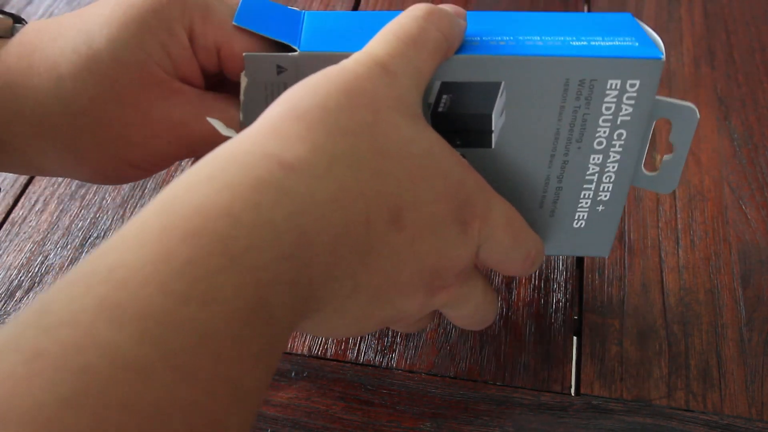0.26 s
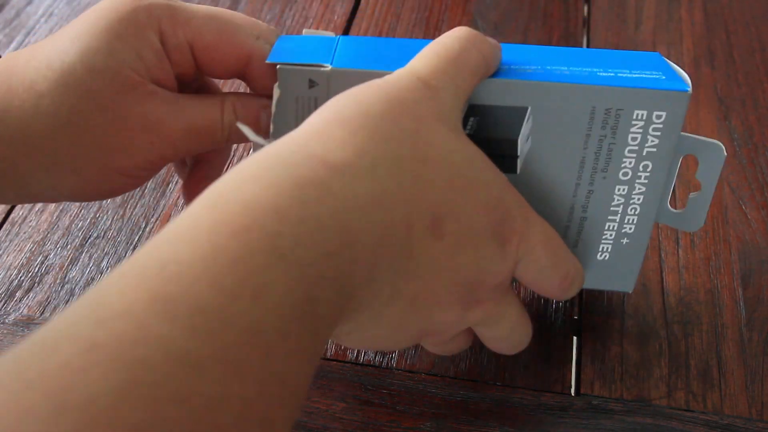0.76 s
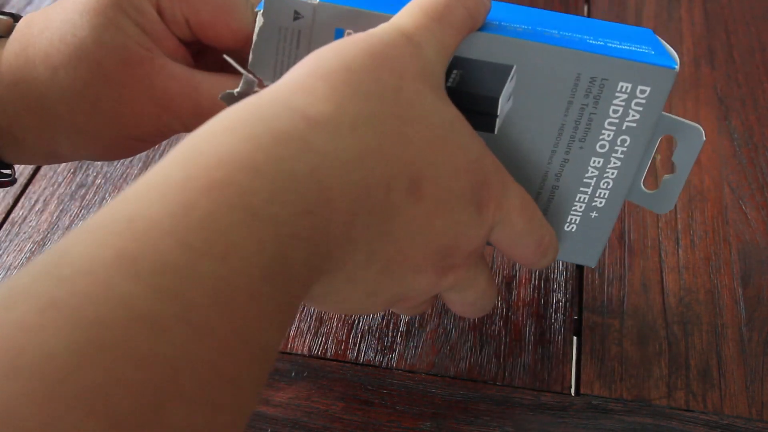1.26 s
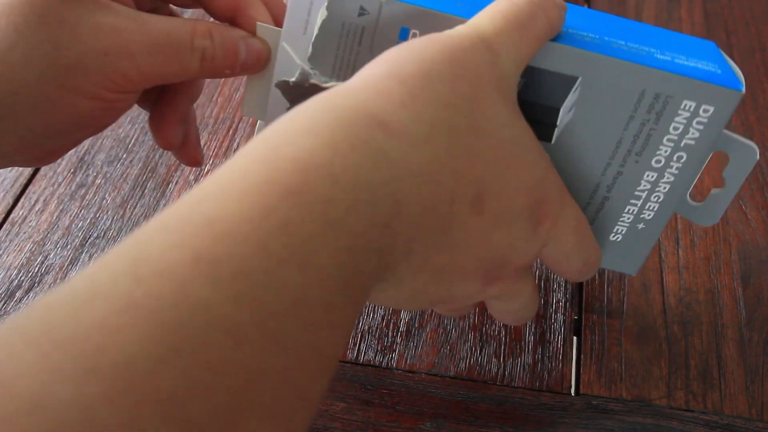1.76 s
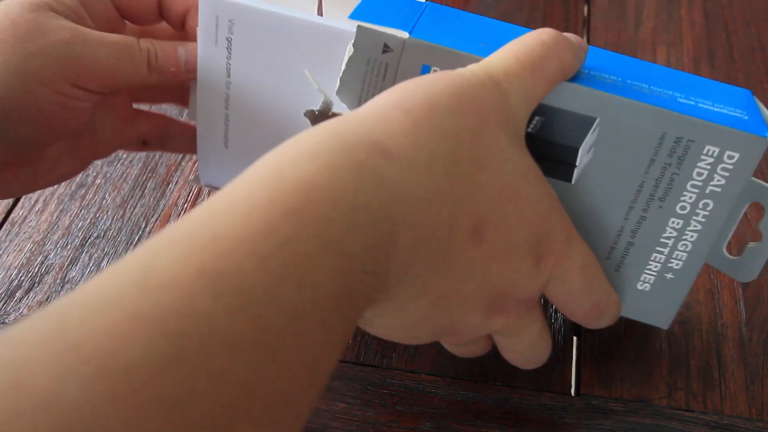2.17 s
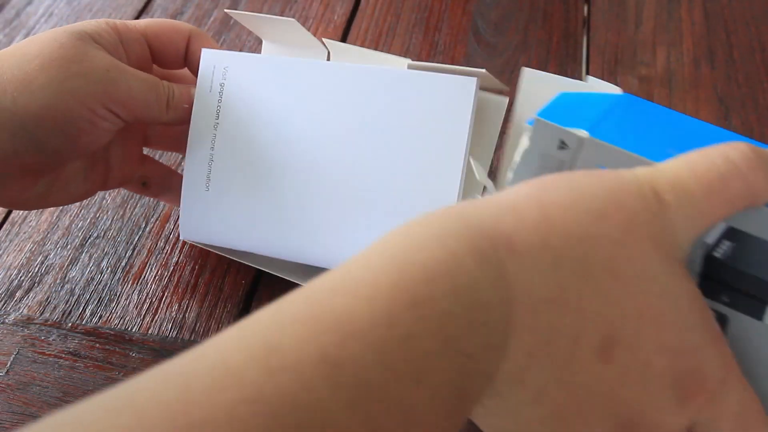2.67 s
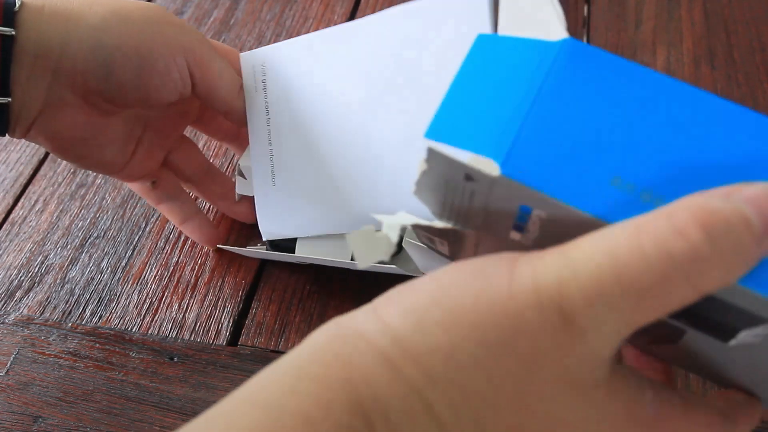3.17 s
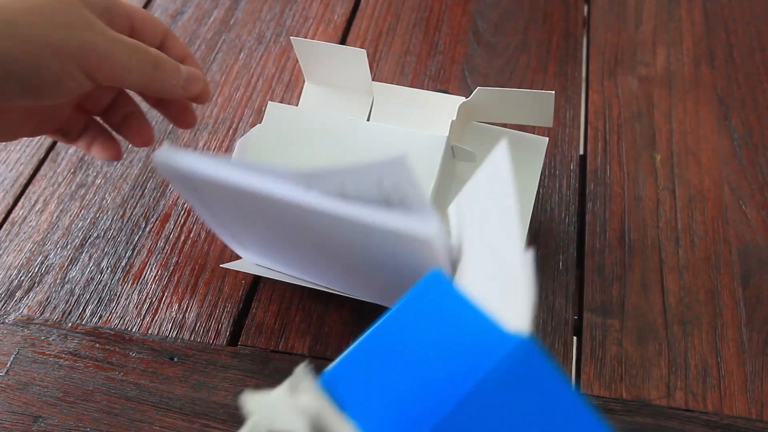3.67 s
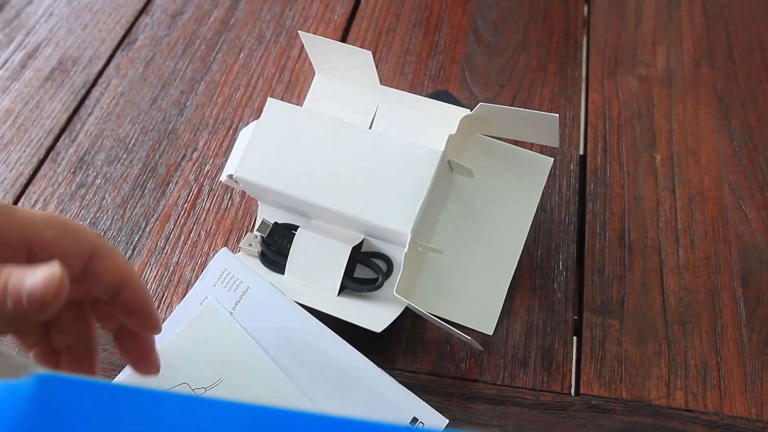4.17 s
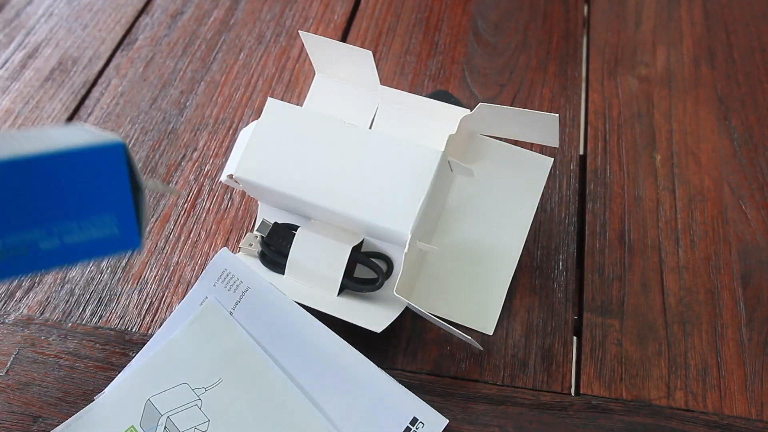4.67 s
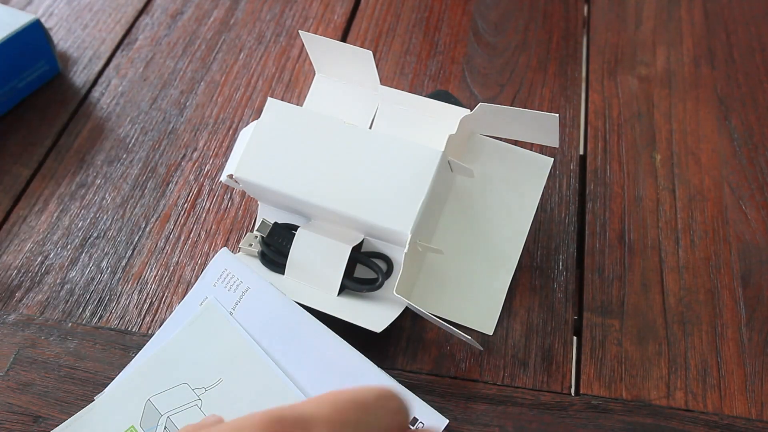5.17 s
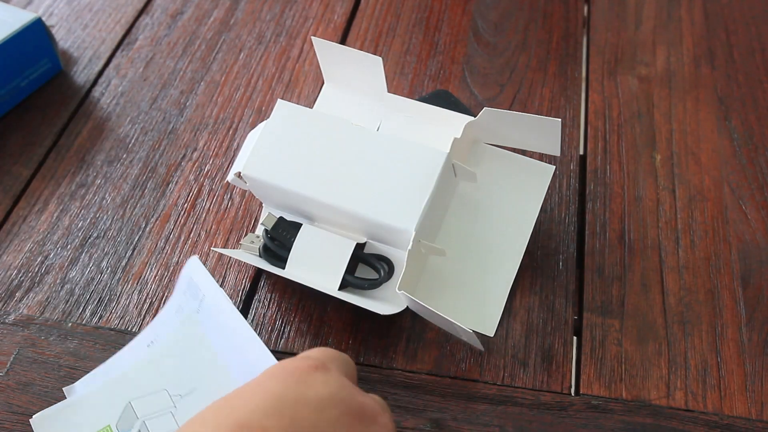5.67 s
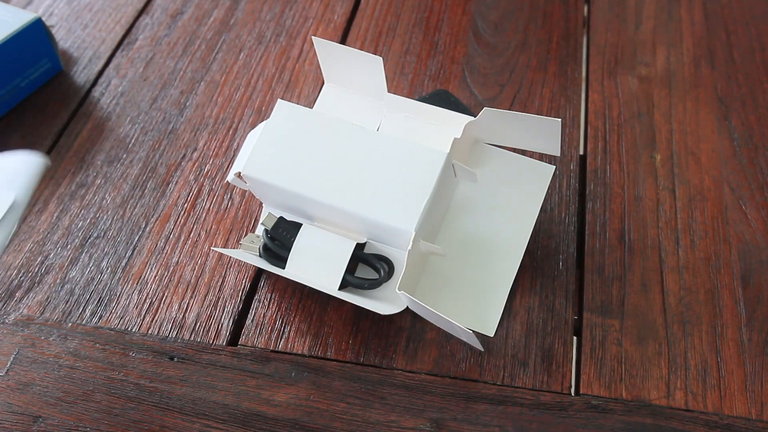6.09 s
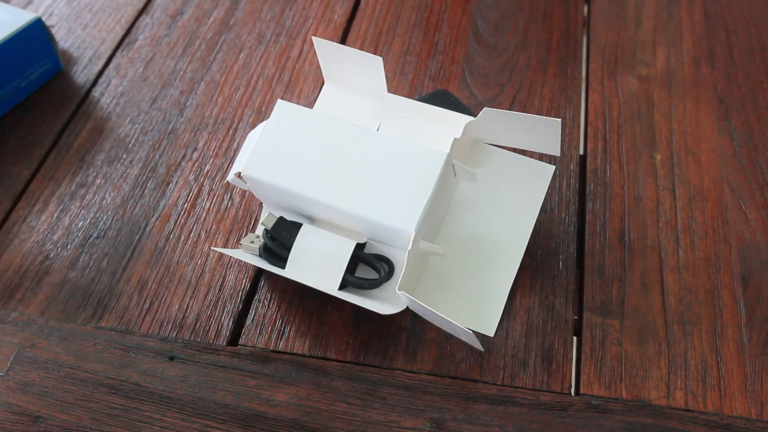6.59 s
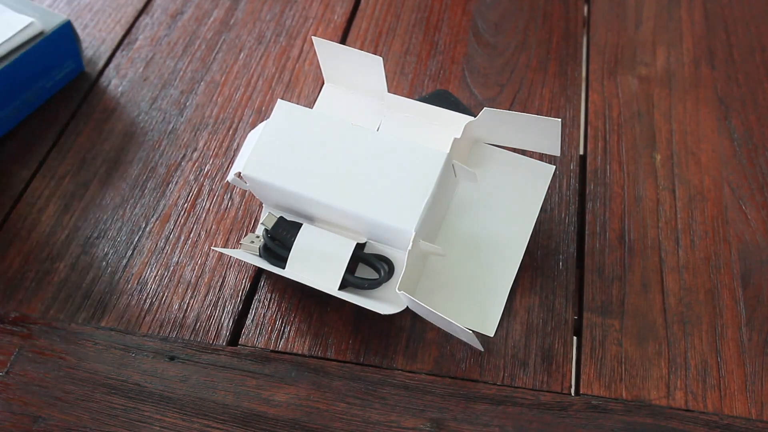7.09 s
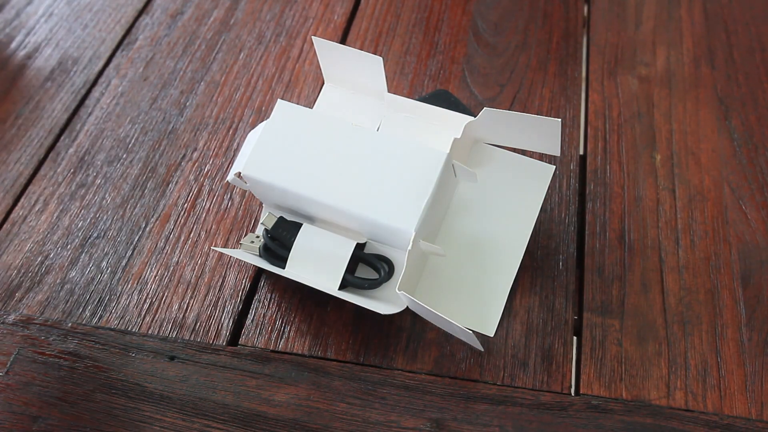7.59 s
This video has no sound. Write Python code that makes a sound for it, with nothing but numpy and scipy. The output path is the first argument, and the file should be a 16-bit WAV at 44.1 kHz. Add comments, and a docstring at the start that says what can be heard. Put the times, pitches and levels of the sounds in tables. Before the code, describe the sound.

Thin cardboard rubs and ticks as a tray is dragged from its sleeve, bumps onto wood, then paper slaps down and packaging knocks the table.

```python
"""Card rubs and ticks close by as a tray is worked out of its sleeve, then bumps, drops and skids on a wooden table.
A paper leaflet slaps down; sleeve and leaflet stroke the boards, and packaging knocks on them.
Impacts are noisy contacts that excite decaying modes, shaped band by band; rubbing is stick-slip friction
through panel resonances; low modes boom under the heavier pushes. A diffuse echo and quiet air surround all.
"""
import sys
import numpy as np
from scipy import signal
from scipy.fft import rfft, irfft, next_fast_len
from scipy.io import wavfile

SR = 44100
rng = np.random.default_rng(int(sys.argv[2]) if len(sys.argv) > 2 else 0)


def file_out(sig):
    """Save sig as 16-bit WAV at sys.argv[1]."""
    # one column per channel
    cols = np.atleast_2d(sig).T
    # limit, then scale
    lim = np.clip(cols, -1, 1)
    pcm = np.round(lim * 32767).astype(np.int16)
    wavfile.write(sys.argv[1], SR, pcm)


N = 345744
TIME = np.arange(N) / SR  # s
BLOW_SIZE = 8192  # samples in one impact
CUTOFF_HZ = 15950  # upper limit of the sound

# edges of the rubbing bands body, rasp and hiss: frequency [Hz]
RUB_EDGES_HZ = [150, 900, 3500, 18000]
# spectrum of card sliding: (frequency [Hz], filter gain [dB])
CARD_SPECTRUM = [(59, -35), (100, -32), (135, -15.5), (229, -10), (389, -4.5), (442, -4.5), (558, -1.5),
                 (891, -4.5), (1310, -3.5), (1680, -6.5), (4980, -13), (13800, -13.5), (16000, -20)]
# the tray creeps, then slides out of the sleeve; levels before the offsets in pulling():
# (time [s], rasp level [dB], hiss level [dB])
PULL_COURSE = [(0.0, -53, -54), (0.4, -51, -60.5), (0.58, -50, -54), (0.69, -51.5, -60), (0.97, -54, -59),
               (1.42, -46.5, -52), (1.59, -38.5, -51), (1.73, -42.5, -37), (1.84, -37.5, -45),
               (2.0, -57, -68), (2.26, -42, -54), (2.42, -47, -48), (2.66, -41.5, -45.5),
               (2.78, -56, -35.5)]


def from_db(db):
    """Convert a level in decibels to an amplitude ratio."""
    return 10 ** (np.asarray(db) / 20)


def rms(x):
    """Root mean square, the effective amplitude."""
    return np.sqrt(np.mean(x ** 2) + 1e-20)


def unit(x):
    """Normalise a signal to energy 1."""
    return x / np.sqrt(np.sum(x ** 2) + 1e-20)


def at_hz(points, hz, axis=1):
    """Interpolate a table column linearly in log frequency."""
    points = np.array(points)
    return np.interp(np.log(np.maximum(hz, 1)), np.log(points[:, 0]), points[:, axis])


def band(x, low, high):
    """Causal Butterworth band-pass: the output never precedes the input."""
    sections = signal.butter(3, [low, high], "band", fs=SR, output="sos")
    return signal.sosfilt(sections, x)


def colour(x, points):
    """Minimum-phase filter, built by folding the cepstrum of a (Hz, dB) curve: nothing sounds early."""
    size = 2 * next_fast_len(len(x) // 2 + BLOW_SIZE)
    gain = from_db(at_hz(points, np.fft.rfftfreq(size, 1 / SR)))
    cepstrum = irfft(np.log(gain))
    cepstrum[1:size // 2] *= 2
    cepstrum[size // 2 + 1:] = 0
    response = np.exp(rfft(cepstrum))
    return irfft(rfft(x, size) * response)[:len(x)]


def drift(rate_hz):
    """Random modulation of spread 1: noise smoothed by a two-pole low-pass."""
    step = 40  # samples between computed values
    r = np.exp(-2 * step * np.pi * rate_hz / SR)
    noise = rng.standard_normal(N // step + 2002)
    slow = signal.lfilter([1], [1, -2 * r, r * r], noise)[2000:]  # past the filter's start
    return np.interp(np.arange(N) / step, np.arange(len(slow)), slow / rms(slow))


def resonance(x, hz, width_hz):
    """Damped two-pole resonator with gain 1 at its peak."""
    r = np.exp(-np.pi * width_hz / SR)
    numerator = np.array([1, 0, -1]) * (1 - r * r) / 2
    denominator = [1, -2 * r * np.cos(2 * np.pi * hz / SR), r * r]
    return signal.lfilter(numerator, denominator, x)


def dying(t60, size=BLOW_SIZE):
    """Exponential decay from 1, falling 60 dB in t60 seconds."""
    return np.exp(-np.log(1000) * np.arange(size) / SR / max(t60, 1e-3))


def ringing(modes, spread_db):
    """Modal superposition: decaying sinusoids whose strengths vary from blow to blow."""
    total = np.zeros(BLOW_SIZE)
    for hz, db, t60 in modes:
        strength = from_db(db + spread_db * rng.standard_normal())
        total += strength * dying(t60) * np.sin(2 * np.pi * hz * TIME[:BLOW_SIZE])
    return total


def add(out, s, sound):
    """Superpose a sound from time s onwards."""
    start = max(round(s * SR), 0)
    out[start:start + len(sound)] += sound[:N - start]


def contact(crack_t60, crack_db, chatter_t60, chatter_db, chatter_hz):
    """Contact force: an impulse, a crack of fibres, and the duller low-passed chatter of loose flaps."""
    crack = rng.standard_normal(BLOW_SIZE) * dying(crack_t60)
    low_pass = signal.butter(1, min(chatter_hz, CUTOFF_HZ), fs=SR)
    chatter = signal.lfilter(*low_pass, rng.laplace(size=BLOW_SIZE) * dying(chatter_t60))
    touch = signal.unit_impulse(BLOW_SIZE)
    return unit(touch + from_db(crack_db) * unit(crack) + from_db(chatter_db) * unit(chatter))


def voiced(blow, edges, levels_db, bass_db):
    """Spectral balance: steer the bands of the first 20 ms to set levels; hard contacts are bright."""
    pairs = list(zip(edges, edges[1:]))
    centres = np.sqrt(np.prod(pairs, axis=1))
    blow = colour(blow, [(edges[0] / 2, bass_db), (2 * edges[0], 0)])  # small panels radiate little bass
    for _ in range(2):  # the second pass refines the balance
        heard = [rms(band(blow[:SR // 50], *pair)) for pair in pairs]
        blow = colour(blow, np.c_[centres, levels_db - 20 * np.log10(heard)])
    return blow


def knocks(hits, modes, tone_db, ring_db, panel_db, crack_t60, crack_db, chatter_db, chatter_hz,
           landing_t60, bass_db, level_db):
    """Impact excitation: contact noise plus ringing panels; a flat sheet lands gradually."""
    # edges of the bands thud, knock, clack, snap and fizz: frequency [Hz]
    hit_edges_hz = [100, 500, 1100, 3000, 7000, 16000]
    # weight adds thud: share for each band [dB per dB of weight]
    weight_share = np.array(np.array([1, 0, 0, 0, 0]))
    # a hard contact adds treble: share for each band [dB per dB of hardness]
    hardness_share = np.array(np.array([0.021, 0.037, 0.67, 1.24, 1.09]))
    struck_band_db = 4.5  # the band that holds the struck panel stands out
    panel_cycles = 16  # periods in which the struck panel falls 60 dB
    out = np.zeros(N)
    for s, panel_hz, strength_db, weight_db, hardness_db, chatter_t60 in hits:
        blow = contact(crack_t60, crack_db, chatter_t60, chatter_db, chatter_hz)
        blow = blow + from_db(ring_db) * unit(ringing(modes, spread_db=7.5))
        panel = ringing([(panel_hz, 0, panel_cycles / panel_hz)], spread_db=0)
        blow = blow + from_db(panel_db) * unit(panel)
        blow = blow * (1 - dying(landing_t60)) ** 2
        bands_db = np.array(tone_db) + weight_db * weight_share + hardness_db * hardness_share
        bands_db = bands_db + struck_band_db * np.histogram([panel_hz], hit_edges_hz)[0]
        add(out, s, voiced(blow, hit_edges_hz, level_db + strength_db + bands_db, bass_db))
    return out


def booms(pushes, modes, rise_t60, level_db):
    """Low modal resonance: a soft push sets low modes ringing with a gradual rise."""
    out = np.zeros(N)
    for s, strength_db in pushes:
        ring = ringing(modes, spread_db=1)
        add(out, s, from_db(strength_db + level_db) * ring * (1 - dying(rise_t60)))
    return out


def friction(slips_per_s, size_db, smooth_db, judder_db, wander_db):
    """Stick-slip: fibres slip in clumps over a smooth drag; the contact keeps favouring other resonances."""
    heights = from_db(size_db * np.minimum(rng.exponential(1, N), 4))
    sizes = heights * rng.choice([-1, 1], N)
    slips = sizes * (rng.random(N) < slips_per_s * from_db(4 * drift(40)) / SR)
    drag = slips / rms(slips) + from_db(smooth_db) * rng.standard_normal(N)
    drag = drag * from_db(judder_db * drift(33))
    wandering = np.zeros(N)
    for hz in np.geomspace(300, 7000, 16):
        wandering += resonance(drag, hz, hz / 8) * from_db(wander_db * np.tanh(drift(12)))
    return drag + wandering


def rubbing(strokes, drag, spectrum, singing_hz, body_db_per_octave, singing_db, singing_q,
            attack_s, sag_db, release_s):
    """Friction-driven resonance: strokes swell, sag and die away; flatter contact makes the panel sing lower."""
    stroke_tail_s = 0.15
    sound = colour(drag, spectrum)
    out = np.zeros(N)
    for s, length, stroke_db, body_db, hiss_db in strokes:
        hz = singing_hz * 2 ** np.clip(-body_db / body_db_per_octave, -2, 2)
        piece = sound[round(s * SR):round((s + length + stroke_tail_s) * SR)]
        piece = piece + from_db(singing_db) * resonance(piece, hz, hz / singing_q)
        t = TIME[:len(piece)]
        rise = 1 - np.exp(-t / attack_s)
        release = np.exp(-np.maximum(t - length, 0) / release_s)
        envelope = rise * from_db(-sag_db * t / length) * release
        levels_db = (stroke_db + body_db, stroke_db, stroke_db + hiss_db)
        for low, high, level_db in zip(RUB_EDGES_HZ, RUB_EDGES_HZ[1:], levels_db):
            part = band(piece, low, high) * envelope
            add(out, s, part / rms(part[t < length]) * from_db(level_db))
    return out


def still_air():
    """Stationary noise: random pressure with the spectrum of a quiet room."""
    # spectrum of the still room: (frequency [Hz], filter gain [dB])
    air_spectrum = [(12, -45), (20, -10), (53, -3.5), (116, -5), (154, -7), (198, -9), (255, -5.5),
                    (422, -6.5), (472, -2.5), (590, -7.5), (7950, -21), (14300, -26.5), (16000, -23.5)]
    noise = colour(rng.standard_normal(N), air_spectrum)
    return from_db(-52) * noise / rms(noise)


def room(x, build_t60):
    """Diffuse reverberation: noise that builds up, then decays at a rate set by frequency."""
    # room echo: (frequency [Hz], decay time t60 [s], level re direct sound [dB])
    echo = [(151, 0.23, -3.5), (396, 0.4, -14), (910, 0.41, -13), (2520, 0.36, -11.5), (6060, 0.21, -14.5),
            (14000, 0.066, -15)]
    edges = np.geomspace(90, CUTOFF_HZ, 11)
    tail = np.zeros(SR)
    for low, high in zip(edges, edges[1:]):
        hz = np.sqrt(low * high)
        shape = dying(at_hz(echo, hz), size=SR) * (1 - dying(build_t60, size=SR)) ** 2
        level = from_db(at_hz(echo, hz, axis=2))
        tail += band(rng.standard_normal(SR), low, high) * shape / np.linalg.norm(shape) * level
    return signal.fftconvolve(x, tail)[:N]


def table_thumps():
    """Structural resonance: heavier blows shake the table top in a low mode."""
    # heavier blows: (time [s], strength before level_db [dB])
    blows = [(4.528, -42), (5.138, -53), (7.609, -30)]
    # table top: (frequency [Hz], strength [dB], decay time t60 [s])
    board_modes = [(111, 1, 0.069)]
    return booms(blows, board_modes, rise_t60=0.005, level_db=6.5)


def sleeve_boom():
    """Cavity resonance: the hollow sleeve booms in low modes when nudged."""
    # nudges: (time [s], strength before level_db [dB])
    nudges = [(6.875, -23.5)]
    # hollow sleeve: (frequency [Hz], strength [dB], decay time t60 [s])
    sleeve_modes = [(413, 2, 0.16), (316, -19, .12), (235, -6, 0.063)]
    return booms(nudges, sleeve_modes, rise_t60=0.032, level_db=4.0)


def paper_strokes():
    """Sliding friction: leaflet and sleeve stroke the boards in jerks."""
    # strokes; body comes from pressing flat, hiss from gliding, both relative to the stroke:
    # (time [s], length [s], level [dB], body [dB], hiss [dB])
    strokes = [(3.53, 0.17, -43.5, -2, -10.5), (3.76, 0.26, -45.5, -9.5, -8.5), (3.86, 0.12, -44, 1, -7),
               (4.52, 0.16, -43, -3, -2), (4.77, 0.15, -54, -4.5, -4), (5.07, 0.16, -52.5, -7, 2.5),
               (5.42, 0.14, -38, -6.5, -6), (5.59, 0.16, -48, -13, -3.5), (5.745, 0.098, -45, -8.5, -9.5),
               (6.102, 0.14, -39, -15, -0.5), (6.253, 0.042, -32, -16.5, -5.5), (6.39, 0.1, -52, -16, -0.5),
               (6.73, 0.22, -44.5, 9, -5), (6.975, 0.091, -37, -0.5, -2.5), (7.09, 0.11, -45, 4, -7),
               (7.2, 0.059, -41, -2.5, -7.5), (7.298, 0.041, -48.5, -2.5, -1.5)]
    # spectrum of the strokes: (frequency [Hz], filter gain [dB])
    paper_spectrum = [(59, -33), (100, 2), (219, -21), (415, -6), (513, -8), (691, -9), (1130, -15.5),
                      (2580, -13), (3120, -18), (3620, -12), (4380, -10), (14400, -1.5), (16000, -12)]
    drag = friction(slips_per_s=600, size_db=5.0, smooth_db=4.5, judder_db=2.5, wander_db=11.0)
    return rubbing(strokes, drag, paper_spectrum, singing_hz=796, body_db_per_octave=9.5, singing_db=-3.0,
                   singing_q=1.9, attack_s=0.0053, sag_db=3.5, release_s=0.022)


def leaflet_slap():
    """Distributed impact: a flat sheet lands gradually, with short-lived modes."""
    # landing: (time [s], struck panel [Hz], strength before level_db [dB], weight [dB], hardness [dB],
    # chatter t60 [s])
    hits = [(3.901, 1920, -20, 0, 0, 0.04)]
    # leaflet: (frequency [Hz], strength [dB], decay time t60 [s])
    modes = [(865, 4, 0.022), (1950, -5, 0.012), (2590, 4, 0.0067), (3170, -9.5, 0.014)]
    # tone of an ordinary slap in thud, knock, clack, snap and fizz: level re its strength [dB]
    tone_db = [-10, -1, 3, -3, -17.5]
    return knocks(hits, modes, tone_db, ring_db=5.0, panel_db=-22.0, crack_t60=0.034, crack_db=7.0,
                  chatter_db=2.0, chatter_hz=4000, landing_t60=0.016, bass_db=-31, level_db=-1.3)


def table_knocks():
    """Impact excitation of a plate: packaging knocks on the boards and rings their modes."""
    # knocks: (time [s], struck panel [Hz], strength before level_db [dB], weight [dB], hardness [dB],
    # chatter t60 [s])
    hits = [(1.04, 506, -29.5, 1, 5.5, 0.038), (4.528, 400, -33, -1, 3, 0.022),
            (5.139, 570, -13.5, -1, -7, 0.063), (5.214, 664, -20.5, -3, 1, 0.23),
            (5.238, 600, -27.5, 2.5, -10, 0.08), (5.251, 685, -24, -3.5, 4, 0.071),
            (5.308, 706, -30, 1, -5, 0.16), (5.418, 650, -35, -8, 4, 0.041),
            (5.548, 1300, -23.5, -5.5, 3.5, 0.091), (6.668, 1390, -31, -2, 2.5, 0.15),
            (6.687, 650, -10.5, -7.5, -8, 0.059), (6.787, 1340, -7.5, -19, -15.5, 0.011),
            (7.042, 414, -28.5, 0, 0, .04), (7.458, 445, -30.5, -1, 4.5, .025),
            (7.611, 3630, -11, -5.5, 2.5, 0.13), (7.67, 687, -13.5, -3.5, 0, .033)]
    # boards: (frequency [Hz], strength [dB], decay time t60 [s])
    modes = [(304, -2, 0.08), (413, -1, 0.08), (593, 2, 0.046), (664, 4.5, 0.03), (800, -5, 0.06),
             (926, -2, 0.036), (2510, 9, 0.014), (3670, 7.5, 0.007)]
    # tone of an ordinary knock in thud, knock, clack, snap and fizz: level re its strength [dB]
    tone_db = [-2.5, -2, -8, -13.5, -21]
    return knocks(hits, modes, tone_db, ring_db=-3.5, panel_db=-5.0, crack_t60=0.011, crack_db=16.5,
                  chatter_db=10.5, chatter_hz=3400, landing_t60=0.0022, bass_db=-19, level_db=-3.5)


def tray_knocks():
    """Impact excitation of thin panels: the tray bumps the sleeve and the table."""
    # bumps: (time [s], struck panel [Hz], strength before level_db [dB], weight [dB], hardness [dB],
    # chatter t60 [s])
    hits = [(2.635, 396, -21, -8.5, -9, 0.21), (2.657, 620, -31.5, -1, 13, 0.089),
            (2.798, 356, -9.5, -8, -4, 0.099), (2.816, 380, -17, -2, 1.5, 0.055),
            (2.847, 910, -21.5, -7, -5.5, 0.36), (2.897, 1420, -20, 0.5, 6, 0.013),
            (3.192, 605, -22, 0, -4, 0.26), (3.209, 597, -22.5, -8.5, -9, 0.17)]
    # tray: (frequency [Hz], strength [dB], decay time t60 [s])
    modes = [(287, -29, 0.14), (397, 10, 0.13), (554, -26.5, 0.19), (694, -5, 0.035), (887, -4, 0.4),
             (1092, 12, 0.037), (1293, 8.5, 0.037), (1450, -12, 0.12), (2024, 1, 0.122), (2766, -11, 0.16),
             (3200, -1, 0.023)]
    # tone of an ordinary bump in thud, knock, clack, snap and fizz: level re its strength [dB]
    tone_db = [-6, -3.5, -3, -15, -22]
    return knocks(hits, modes, tone_db, ring_db=-5.5, panel_db=-10.0, crack_t60=0.016, crack_db=14.5,
                  chatter_db=15.5, chatter_hz=2550, landing_t60=0.00084, bass_db=-38.0, level_db=0.5)


def scattered_catches(count, level_db, spread_db):
    """Irregular stick-slip: faint to moderate catches at uneven intervals through the pull, as tick rows."""
    place, size = rng.uniform(-1.2, 1, (count, 2)).T
    times = (np.arange(count) + 0.5 + place / 2) / count * PULL_COURSE[-1][0]
    return [(s, db, 0) for s, db in zip(times, level_db + spread_db * size)]


def ticks(catches, crack_t60, crack_db, chatter_t60, chatter_db, chatter_hz, panel_db, bass_db, level_db):
    """Sudden release: a card edge slips off another and briefly shakes the panels."""
    # card panels: (frequency [Hz], width [Hz], strength before panel_db [dB])
    panels = [(392, 11, 5), (540, 130, 3.5), (895, 51, 7.5), (1220, 210, 7), (2760, 210, -4.5),
              (5350, 980, -5)]
    # tone of an ordinary tick in body, rasp and hiss: level re the tick [dB]
    tone_db = np.array([-0.5, 0, -6.0])
    # a bright tick trades body for hiss: change in each band [dB per dB of brightness]
    tilt = np.array([-1.32, 0, 0.32])
    out = np.zeros(N)
    for s, tick_db, brightness_db in catches:
        touch = contact(crack_t60, crack_db, chatter_t60, chatter_db, chatter_hz)
        shaken = sum(from_db(db) * resonance(touch, hz, width) for hz, width, db in panels)
        blow = touch + from_db(panel_db) * shaken
        bands_db = level_db + tick_db + tone_db + brightness_db * tilt
        add(out, s, voiced(blow, RUB_EDGES_HZ, bands_db, bass_db))
    return out


def card_ticks():
    """Edge release: single catches at set times, strong and faint, with scattered ones through the pull."""
    # single catches of card edges: (time [s], level before level_db [dB], brightness [dB])
    single_catches = [(0.055, -39.5, -2), (0.221, -34.5, 3.5), (0.372, -43.5, 0), (0.452, -45, 1),
                      (0.507, -43, 15.5), (0.547, -40.5, 13), (0.59, -36, 2), (0.867, -45, -3.5),
                      (0.945, -35, -2.5), (1.2, -42, -3.5), (1.444, -38.5, -1.5), (1.5, -36, 1),
                      (1.519, -28.5, 1.5), (1.677, -33, -3.5), (1.733, -27, -0.5), (1.98, -37.5, -5),
                      (2.222, -33, 2), (2.441, -29.5, -3.5), (2.695, -32, 24), (3.025, -38, 5),
                      (3.293, -30, 5.5), (3.581, -36.5, 4), (4.634, -37.5, -1), (4.812, -35, 5.5),
                      (5.144, -23.5, 11.5), (6.149, -43.5, -8), (6.431, -42, 15), (6.787, -28, 23.5)]
    catches = single_catches + scattered_catches(count=24, level_db=-42.5, spread_db=3.0)
    return ticks(catches, crack_t60=0.0086, crack_db=-8.5, chatter_t60=0.032, chatter_db=4.5,
                 chatter_hz=2980, panel_db=6.5, bass_db=-22, level_db=-2.53)


def card_strokes():
    """Sliding friction: card jerks along card, then the freed tray skids and clatters on the table."""
    # jerks and skids; body comes from pressing flat, hiss from gliding, both relative to the stroke:
    # (time [s], length [s], level [dB], body [dB], hiss [dB])
    strokes = [(0.65, 0.051, -35.5, -7.5, -8), (1.565, 0.025, -31, -10.5, -7), (1.665, 0.07, -38, -7, 3.5),
               (1.84, 0.17, -39, -6, -1), (2.33, 0.18, -40.5, -4, -2.5), (2.68, 0.1, -38, -8, -3),
               (2.91, 0.061, -27.5, -0.5, -22), (3.0, 0.52, -45.5, -3, -8), (3.23, 0.079, -42, -3, -10)]
    drag = friction(slips_per_s=400, size_db=3.0, smooth_db=7.0, judder_db=1.03, wander_db=2.0)
    return rubbing(strokes, drag, CARD_SPECTRUM, singing_hz=867, body_db_per_octave=12.5, singing_db=-6.0,
                   singing_q=4.6, attack_s=0.0094, sag_db=4.5, release_s=0.023)


def pulling(drag, singing_db, singing_q, body_db, rasp_db, hiss_db):
    """Friction-driven wall resonance: body and rasp rise together, hiss comes with sliding."""
    sleeve_hz = 1334  # the sleeve wall sings under the pull
    s, rasp, hiss = np.transpose(PULL_COURSE)
    sound = colour(drag, CARD_SPECTRUM)
    sound = sound + from_db(singing_db) * resonance(sound, sleeve_hz, sleeve_hz / singing_q)
    curves_db = (rasp + body_db, rasp + rasp_db, hiss + hiss_db)
    out = np.zeros(N)
    for low, high, curve_db in zip(RUB_EDGES_HZ, RUB_EDGES_HZ[1:], curves_db):
        part = band(sound, low, high)
        out += part / rms(part) * from_db(np.interp(TIME, s, curve_db))
    return out * np.interp(TIME, [s[-1], s[-1] + 0.03], [1, 0])  # fades at the end of the pull


def tray_pull():
    """Stick-slip at a sliding joint: the tray drags along inside the sleeve."""
    creep = friction(slips_per_s=220, size_db=4.5, smooth_db=3.0, judder_db=-1.0, wander_db=13.5)
    return pulling(creep, singing_db=2.5, singing_q=6.4, body_db=-2.5, rasp_db=1.5, hiss_db=-1.5)


def scene():
    """Linear superposition: direct sound of all sources, its room echo and still air."""
    lows = table_thumps() + sleeve_boom()
    rubs = paper_strokes() + card_strokes() + tray_pull()
    impacts = leaflet_slap() + table_knocks() + tray_knocks() + card_ticks()
    near = lows + rubs + impacts
    return (near + room(near, build_t60=0.013) + still_air())[None]


def record(dry):
    """Overload and band limit: peaks beyond full scale are clipped, then the top is cut."""
    low_pass = signal.ellip(10, 0.1, 80, CUTOFF_HZ, fs=SR, output="sos")
    return signal.sosfilt(low_pass, np.clip(dry, -1, 1))


dry = scene()
out = record(dry)
file_out(out)
```